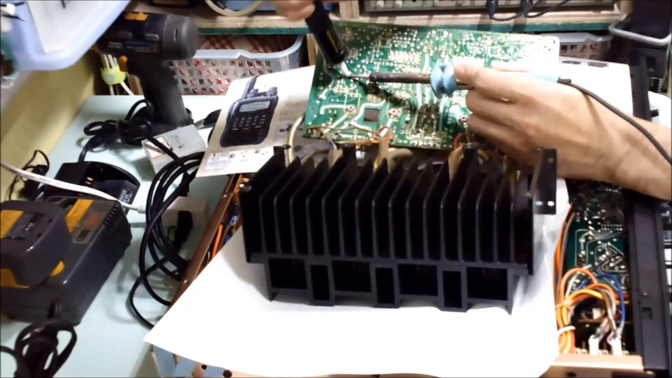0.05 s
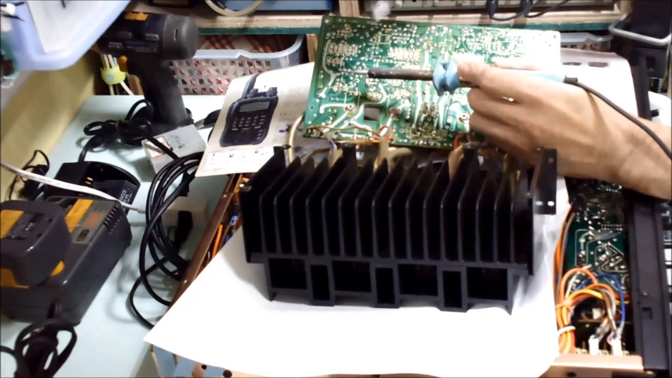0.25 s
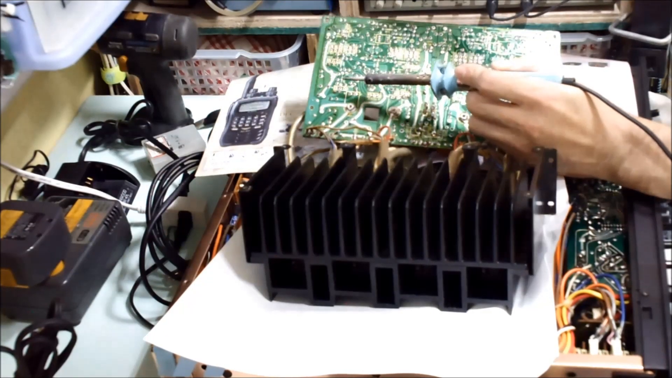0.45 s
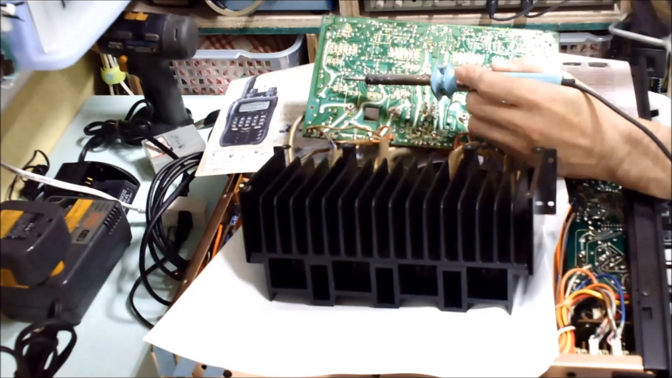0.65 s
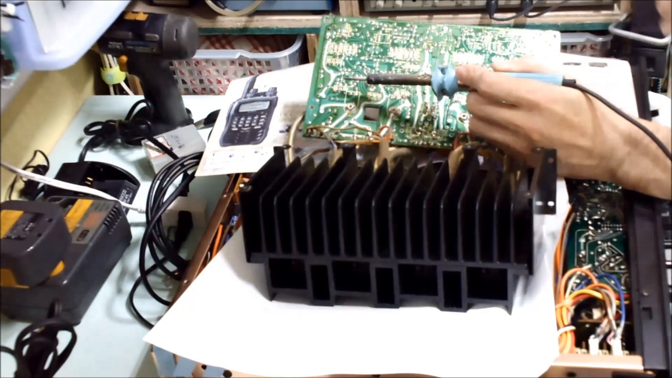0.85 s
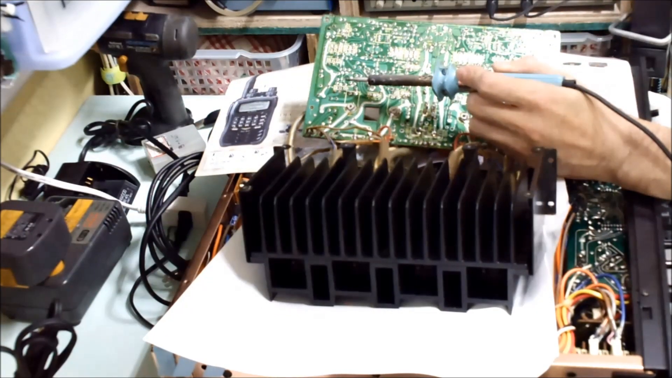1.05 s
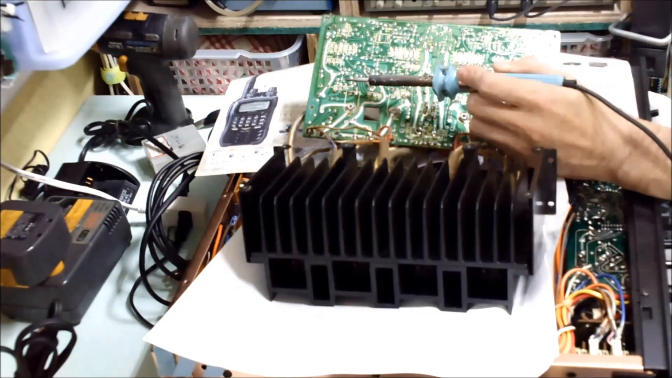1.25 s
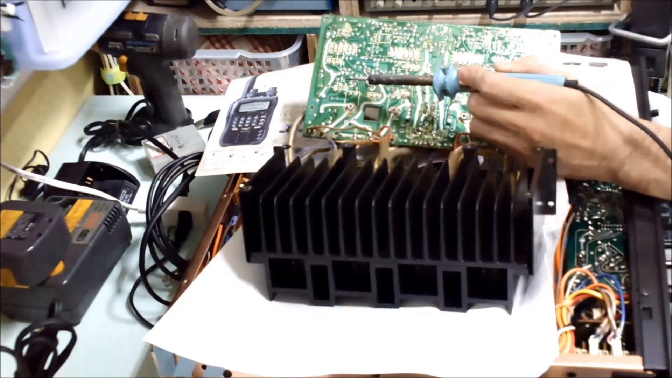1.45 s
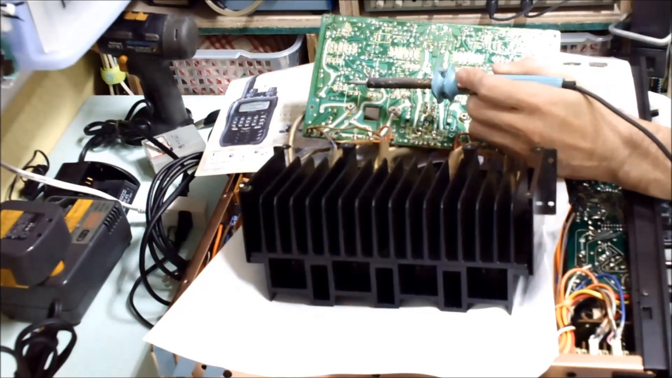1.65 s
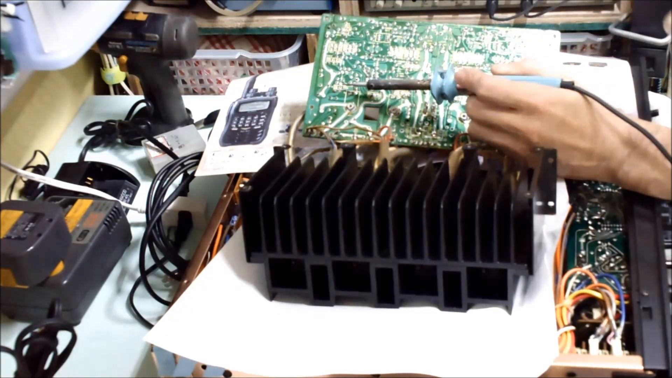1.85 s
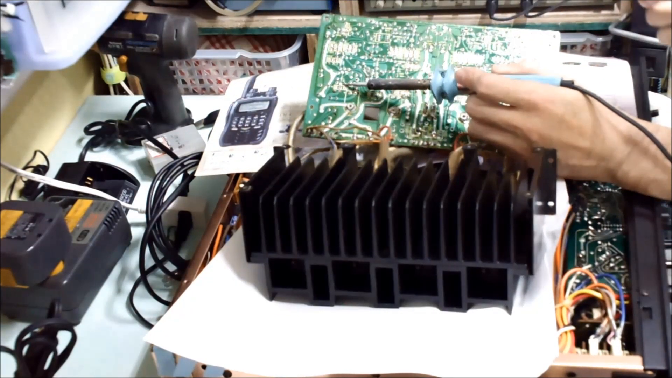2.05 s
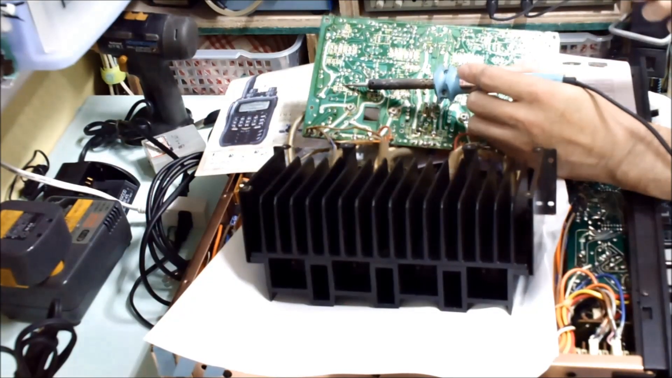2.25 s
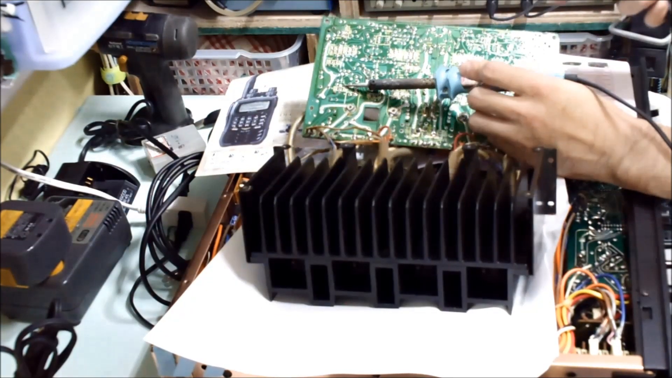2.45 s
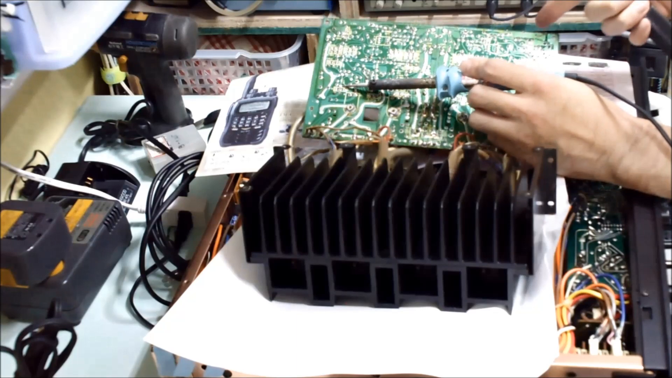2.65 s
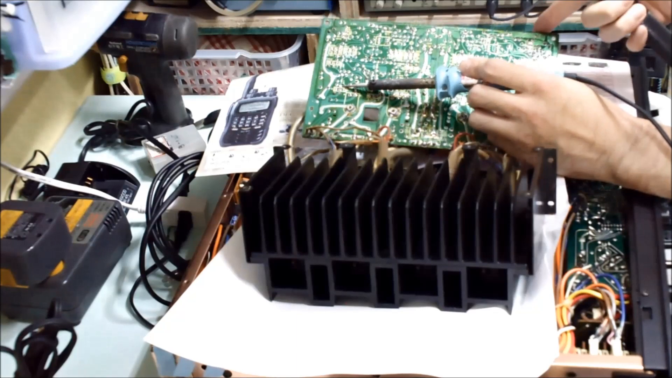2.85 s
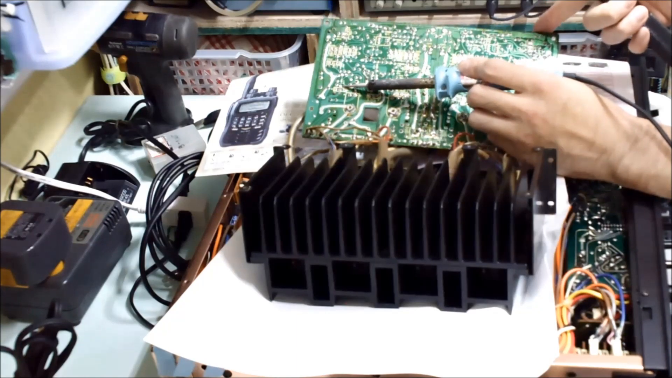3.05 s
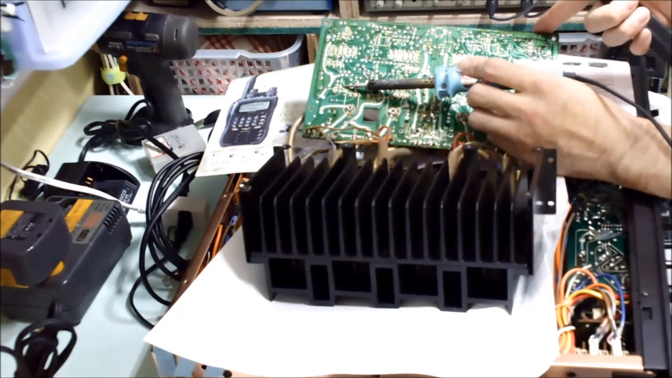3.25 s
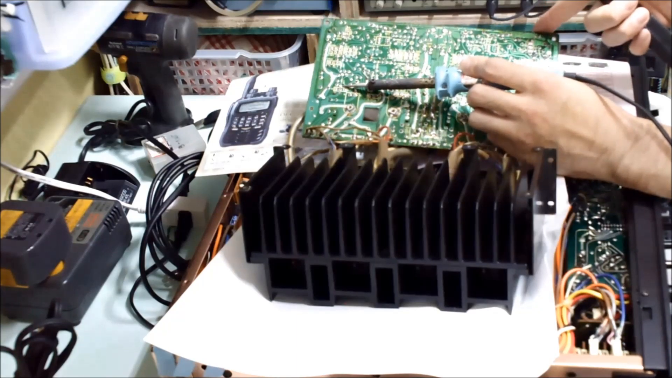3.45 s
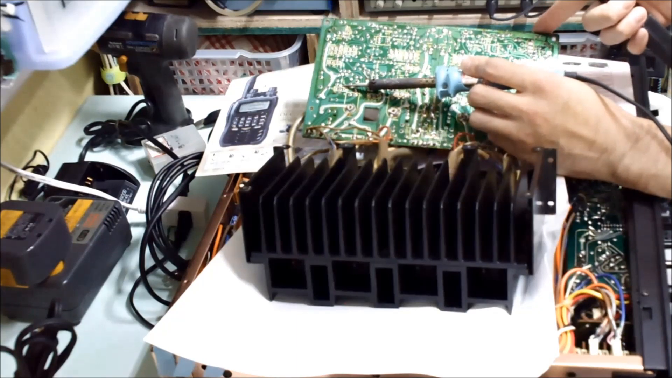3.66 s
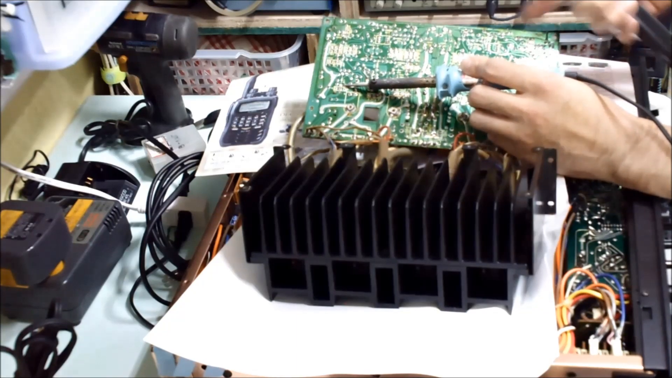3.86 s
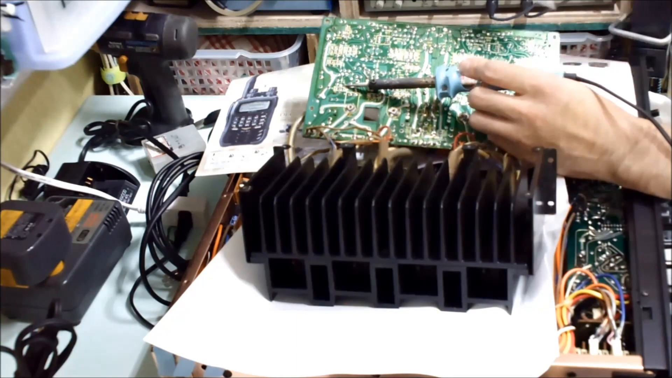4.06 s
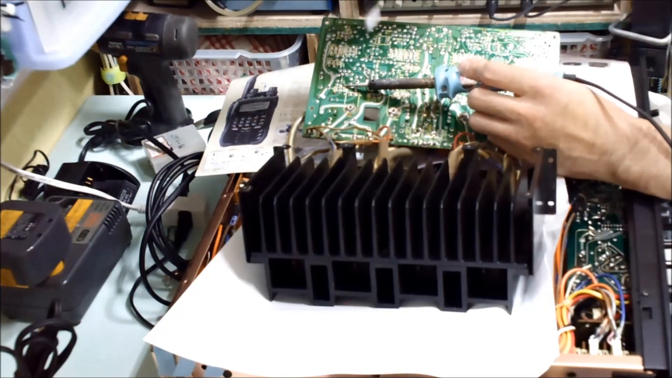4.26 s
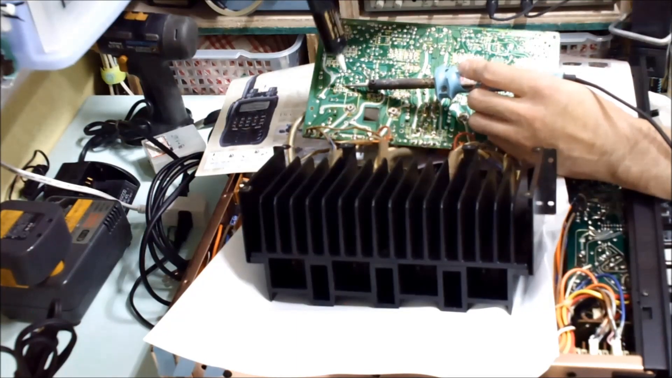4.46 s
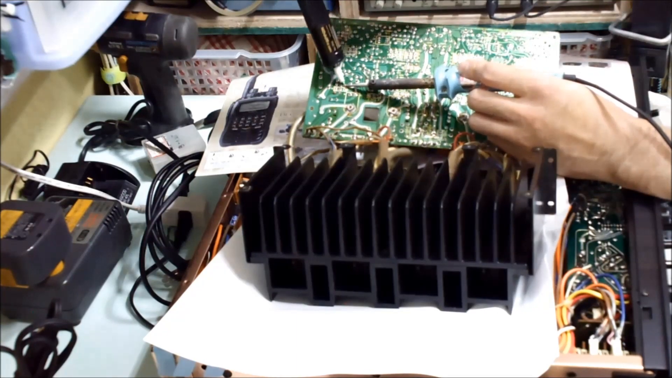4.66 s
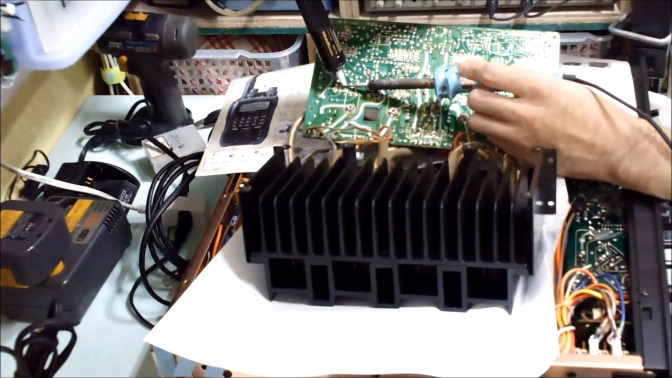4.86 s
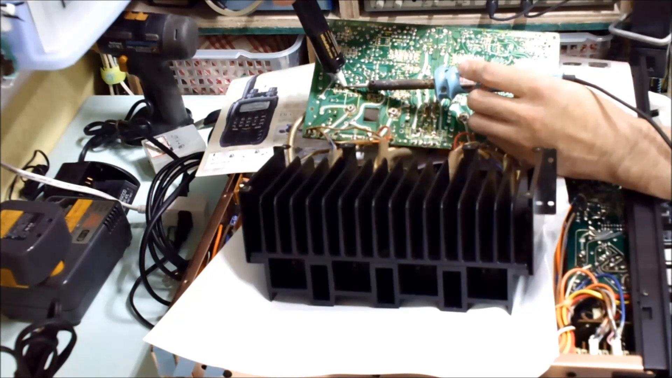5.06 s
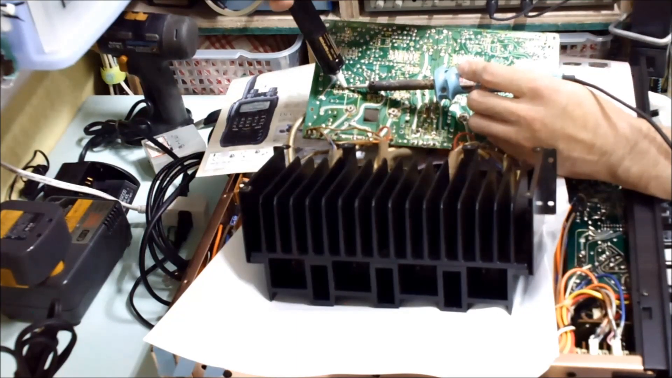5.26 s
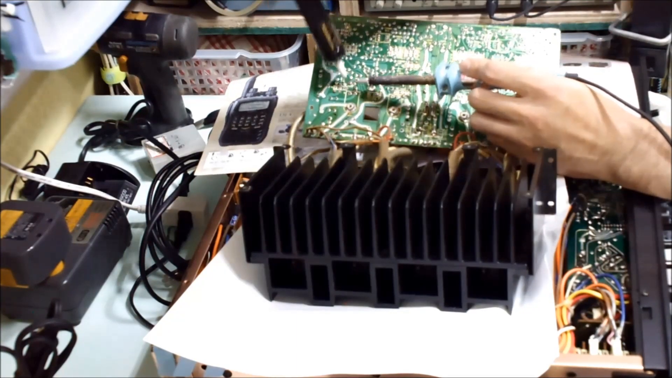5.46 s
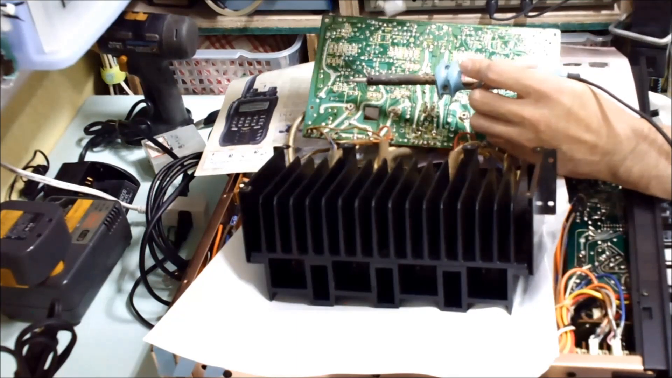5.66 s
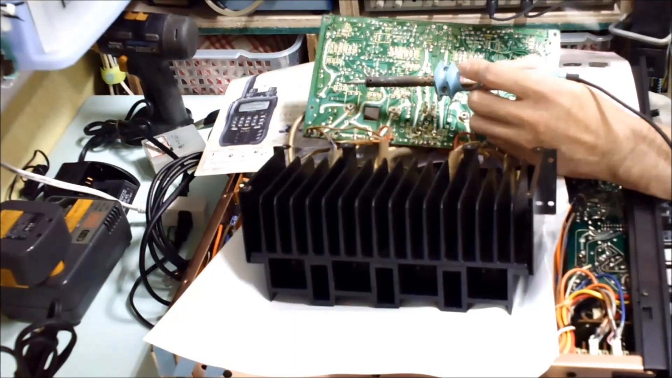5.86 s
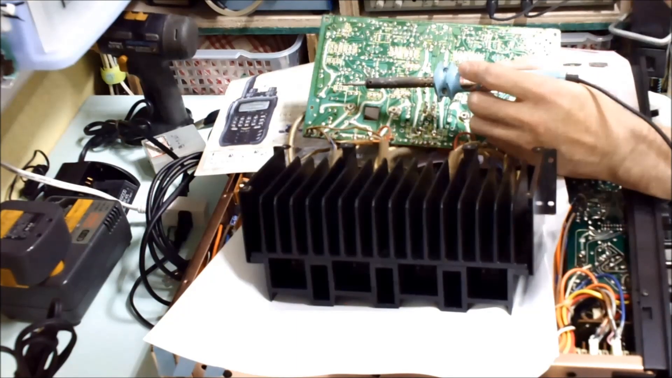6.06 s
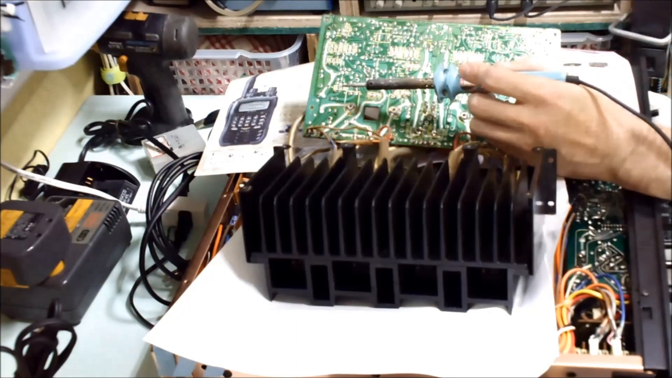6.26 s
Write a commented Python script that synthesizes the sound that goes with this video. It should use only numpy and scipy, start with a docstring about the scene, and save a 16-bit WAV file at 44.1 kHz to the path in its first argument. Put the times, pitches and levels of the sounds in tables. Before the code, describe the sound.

Close in a small dry room, a desoldering pump fires almost at once with a brief air rush, hard crack and springy ring, then a softer nozzle bounce. Light taps and scuffs on a circuit board follow. The pump is recocked with grainy friction, a sharp latch click and a hollower rod knock. More tiny ticks and faint flux sizzle lead to a second shot near the end, over low rumble and hiss.

```python
"""Desoldering pump at a workbench

A spring-loaded pump fires twice on a circuit board in a small room: noise rush of the plunger, hard stop,
ringing spring and board modes. In between it is cocked (grainy friction, gliding whistles) and latched.
Tips tap and scuff the board as filtered bursts, flux sizzles as random grains, over a low rumble, hiss
and a faint electrical ticking. The overall level sinks after each shot and returns in two stages."""
import sys
import numpy as np
from scipy import signal
from scipy.fft import rfft, irfft
from scipy.io import wavfile

SR = 44100
rng = np.random.default_rng(int(sys.argv[2]) if len(sys.argv) > 2 else 0)


def store_wav(level_fs):
    """Save 16-bit WAV to argv[1]."""
    pcm = np.round(np.clip(np.atleast_2d(level_fs), -1, 1) * 32767)
    wavfile.write(sys.argv[1], SR, pcm.T.astype(np.int16))


N = 277830
TIME_S = np.arange(N) / SR

# Rumble colour: (frequency [Hz], level [dB])
RUMBLE_COLOUR = [(15, -5), (30, -1), (54, 2), (80, -2.5), (125, -5.5), (200, -12), (320, -17), (550, -23.5),
                 (1000, -29), (2500, -36), (6000, -56.5)]
# Hiss colour: (frequency [Hz], level [dB])
HISS_COLOUR = [(1000, 0.5), (3300, 2), (3950, 8), (4600, 9), (5400, 8), (6300, 0), (7900, 0), (10000, -1),
               (15500, -2)]
# Narrow rise in the hiss: (centre [Hz], width [Hz], lift [dB])
HISS_WHINE = [(7930, 250, 4.5)]
TICK_HZ, FIRST_TICK_S, TICK_LEAD_S, TICK_JITTER_S = 29.993, 0.0199, 0.004, 0.0005
# Decay of the reflections: (frequency [Hz], t60 [s])
ROOM_T60 = [(100, 0.29), (700, 0.15), (2000, 0.17), (4600, 0.18), (8000, 0.16), (15000, 0.12)]

# Bursts of flux boiling under the iron: (peak time [s], level [dB], rise [s], fall [s])
SIZZLES = [(2.6, -68, .25, .35), (4.3, -56, 0.071, .22)]
# Flux colour: (frequency [Hz], level [dB])
FLUX_COLOUR = [(500, -18), (2300, -15), (3300, -14), (4200, -2.5), (4620, -4.5), (5100, -11), (6500, -19),
               (9000, -32), (15500, -24)]
# Flux resonance: (centre [Hz], width [Hz], lift [dB])
FLUX_RESONANCE = [(4530, 130, 11)]

# Tips sliding on the board: (peak time [s], level [dB], rise [s], fall [s])
SCUFFS = [(0.83, -61.5, .015, .04), (1.015, -58, 0.0066, 0.038), (2.12, -60.5, .008, 0.018),
          (2.35, -59, .006, .03), (5.42, -56.5, 0.055, .03)]
# Nozzle skid around each landing: (level [dB], rise [s], fall [s])
LANDING_SKID = (-42, .004, .03)
SCUFF_TILT_DB_PER_OCT = -2

# Short bursts, tip contacts and electrical ticks together: (time [s], level [dB], treble tilt [dB/octave])
SHORT_BURSTS = [(0.043, -46.5, -5.5), (0.737, -50, -1.5), (1.203, -46.5, 3.5), (1.381, -49, 4),
                (2.369, -48, 2.5), (2.4654, -46.5, 2), (2.5555, -50, 1), (2.7205, -44.5, 4),
                (2.783, -48, 2), (2.855, -49, 4), (3.320, -49, 6), (3.379, -53.5, 2), (3.844, -50.5, 4),
                (3.9865, -35.5, .5), (5.0814, -36, 3)]
STANDOUT_TICK_TIMES_S = (2.855, 3.320, 3.379, 3.844)
# Electrical ticks that stand out by chance: (time [s], level [dB], treble tilt [dB/octave])
STANDOUT_TICKS = [row for row in SHORT_BURSTS if row[0] in STANDOUT_TICK_TIMES_S]
# Pump tip and iron touching the board: (time [s], level [dB], treble tilt [dB/octave])
TAPS = [row for row in SHORT_BURSTS if row[0] not in STANDOUT_TICK_TIMES_S]
# Colour of the short bursts and scuffs: (frequency [Hz], level [dB])
BURST_COLOUR = [(150, -25.5), (450, -11), (1200, -3.5), (2000, -2.5), (3300, -2.5), (4700, 6.5), (5800, -6),
                (7500, -17), (11000, -31.5), (15500, -35)]
# Resonance of the short bursts: (centre [Hz], width [Hz], lift [dB])
BURST_RESONANCE = [(4704, 320, 4)]
BURST_T60_S = 0.041
# Span of the chance touches: (first [s], last [s])
TOUCH_SPAN_S = (.7, 5.45)
TOUCH_DB, TOUCH_SPREAD_DB, TOUCH_TILT_DB_PER_OCT = -55, 2, -1.5
# Recoil lifts the nozzle; it lands this long after the stop, then bounces
REBOUND_S, BOUNCE_S, REBOUND_TILT_DB_PER_OCT = 0.1285, 0.021, -3

# Pushes of the piston along the barrel: (start [s], length [s], level [dB])
PUSHES = [(1.108, .07, -67), (1.252, 0.054, -57.5), (1.385, 0.34, -53), (1.742, 0.023, -46.5)]
PUSH_ATTACK_S, PUSH_RELEASE_S = 0.02, 0.02
# Colour of the piston friction: (frequency [Hz], level [dB])
RUB_COLOUR = [(400, -14.5), (1000, -12), (2500, -12.5), (3500, -10), (4200, 4.5), (4700, 4), (5600, -8.5),
              (7500, -19), (10000, -27), (15500, -36)]
# Released rod scrapes back to its knock; the spring keeps rustling
ROD_SCRAPE_DB, ROD_SCRAPE_S, RUSTLE_DB, RUSTLE_S = -32.5, 0.0062, -54, 0.083
# Lowest air resonance of the barrel, falling as the piston travels: (time [s], frequency [Hz])
AIR_PITCH = [(1.25, 1282), (1.41, 1093), (1.50, 930), (1.62, 810), (1.72, 665), (1.85, 600)]
# First two odd barrel modes: (multiple of the pitch, peak time [s], level [dB], rise [s], fall [s])
AIR_MODES = [(1, 1.41, -65, 0.066, 0.18), (3, 1.72, -60.5, .08, .08)]
# Thin tone after the rod knock: (frequency [Hz], peak time [s], level [dB], rise [s], fall [s])
AFTERTONE = (2200, 1.97, -62.5, .02, 0.15)
# Short hollow blips at the end of the stroke: (time [s], frequency [Hz], level [dB], rise [s])
BLIPS = [(1.7705, 603, -45.5, 0.006), (1.825, 1120, -50, 0.0031)]

# Latch catching: (time [s], level [dB], t60 [s])
LATCH_HIT = (1.7385, -21.5, 0.015)
# Latch colour: (frequency [Hz], level [dB])
LATCH_COLOUR = [(300, -36), (1300, -38), (1900, -1.5), (2300, -11), (3200, -3), (4700, 0), (6300, -10),
                (8800, -10), (11500, -23), (15500, -34)]
# Latch resonances: (centre [Hz], width [Hz], lift [dB])
LATCH_RESONANCES = [(1974, 110, 10.7), (2720, 100, 3.8), (4740, 700, 8.9)]
# Plunger rod knocking back against the latch: (time [s], level [dB], t60 [s])
ROD_HIT = (1.8915, -20.5, 0.033)
# Rod colour: (frequency [Hz], level [dB])
ROD_COLOUR = [(200, -36), (480, -8), (1000, -5), (1500, -7), (1900, 0.5), (2450, -8), (3200, -10.5),
              (4300, -2), (5200, -4), (6500, -19.5), (9000, -24.5), (15500, -51)]
# Rod resonances: (centre [Hz], width [Hz], lift [dB])
ROD_RESONANCES = [(617, 92, 10.4), (2050, 280, 6.8), (2760, 80, 4.9), (4250, 410, 6.5)]

# Pump shots: (trigger [s], plunger stop [s], rush [dB], stop [dB], board thump [dB],
#              nozzle landing [dB], loss per bounce [dB], dip of the overall level [dB])
SHOTS = [(0.1038, 0.1142, -17.5, -9.5, -29, -26.5, 6, -6.5),
         (5.4560, 5.4663, -17.5, -10.5, -31, -31, 15.5, -11)]
# Pump body colour: (frequency [Hz], level [dB])
PUMP_COLOUR = [(100, -15), (280, -19), (500, -14.5), (1050, -15), (1700, -8), (2800, -9), (3800, -3),
               (4600, 2.5), (5700, -2), (7000, -9), (9000, -22.5), (11500, -24), (15500, -37)]
# Barrel resonances: (centre [Hz], width [Hz], lift [dB])
BARREL_RESONANCES = [(817, 160, 7.7), (1440, 56, 8.7), (2000, 330, 3.1), (3210, 100, 6.1), (4700, 460, 3.5),
                     (5770, 80, 3.3), (10800, 550, 3)]
# Bending modes of the board: (frequency [Hz], level [dB], t60 [s])
BOARD_MODES = [(57, -4, 0.41), (125, -3, 0.18), (165, -9, 0.16), (377.7, -11.5, 0.2)]
# Spring and barrel modes ringing after the stop: (frequency [Hz], level [dB], t60 [s])
SPRING_MODES = [(1358, -22, .12), (4120, -17, 0.16), (4500, -20.5, 0.15), (4460, -19, .15),
                (4590, -16, 0.19), (4720, -12.5, 0.1), (4770, -17, 0.087), (5120, -19, .12),
                (5385, -17.5, 0.14), (5840, -23, 0.099)]
CRACK_DB = 16  # first pulse of a blow, relative to its chatter

# Overall level after a shot: sinks, holds, jumps part of the way back, later recovers
DIP_SINK_S, DIP_HOLD_S, DIP_JUMP_S = 0.061, 0.502, 0.02
DIP_LEFT_SHARE, DIP_LINGER_S, DIP_RECOVER_S = 0.48, 1.535, 0.62
CUTOFF_HZ = 15750


def from_db(db):
    """Decibels to gain."""
    return 10 ** (np.asarray(db) / 20)


def at_hz(points, hz):
    """Interpolate a table on a log-frequency axis."""
    freqs, values = np.transpose(points)
    return np.interp(np.log(np.maximum(hz, 1)), np.log(freqs), values)


def level_curve(rows):
    """Gain over time from (time [s], level [dB]) rows; silent outside them."""
    times, levels_db = np.transpose(rows)
    inside = np.interp(TIME_S, times, np.ones(len(times)), 0, 0)
    return inside * from_db(np.interp(TIME_S, times, levels_db))


def ramp(start_s, length_s):
    """Linear rise from 0 to 1."""
    return np.clip((TIME_S - start_s) / length_s, 0, 1)


def swell(peak_s, db, rise_s, fall_s):
    """Gain with exponential growth to its peak and exponential decay after it."""
    before = (peak_s - TIME_S) / rise_s
    after = (TIME_S - peak_s) / fall_s
    return from_db(db) * np.exp(-np.minimum(np.maximum(before, after), 20))


def add(out, start_s, sound):
    """Mix a sound in at its start time."""
    start = round(start_s * SR)
    out[start:start + len(sound)] += sound[:N - start]


def colour(x, spectrum, resonances=(), tilt_db_per_oct=0, size=8192):
    """Minimum-phase filter from a broad spectrum and resonances; white noise keeps its power."""
    hz = np.fft.rfftfreq(size, 1 / SR)
    db = at_hz(spectrum, hz) + tilt_db_per_oct * np.log2(np.maximum(hz, 500))  # tilt from 500 Hz up
    for centre_hz, width_hz, lift_db in resonances:
        db = db + lift_db / (1 + (2 * (hz - centre_hz) / width_hz) ** 2)
    cepstrum = irfft(np.log(from_db(db)))
    causal = 2 * cepstrum[:size // 2]  # folded cepstrum gives minimum phase
    kernel = irfft(np.exp(rfft(causal, size)))
    kernel = kernel / np.linalg.norm(kernel)
    return signal.oaconvolve(x, kernel)[:len(x)]


def grains(per_s):
    """Sparse random slips or bursts, rms 1."""
    present = rng.random(N) < per_s / SR
    return rng.standard_normal(N) * present * np.sqrt(SR / per_s)


def blow(db, t60_s, crack_db, size=12000):
    """One sharp pulse, then dense, quickly dying chatter."""
    force = rng.standard_normal(size) * from_db(-60 * TIME_S[:size] / t60_s)
    force[0] = from_db(crack_db)
    return from_db(db) * force


def ring(start_s, db, modes):
    """Struck modes: decaying sines, each level varying from blow to blow."""
    age_s = np.maximum(TIME_S - start_s, 0)
    out = np.zeros(N)
    for hz, mode_db, t60_s in modes:
        fade_db = np.maximum(-60 * age_s / t60_s, -200)
        gain = from_db(db + mode_db + rng.normal(0, 1) + fade_db)
        out += gain * np.sin(2 * np.pi * hz * age_s)
    return out


def short_bursts(rows, settle_s=0.00087):
    """Dull or bright noise bursts with a softened onset."""
    out = np.zeros(N)
    for time_s, db, tilt in rows:
        force = blow(db, BURST_T60_S, crack_db=0)
        onset = 1 - np.exp(-TIME_S[:len(force)] / settle_s)
        add(out, time_s, colour(force * onset, BURST_COLOUR, BURST_RESONANCE, tilt))
    return out


def room(x, size=22050):
    """Diffuse reflections off bench and walls: noise bands, each with its own decay."""
    hz = np.fft.rfftfreq(size, 1 / SR)
    white = rfft(rng.standard_normal(size))
    echoes = 0
    for k, (_, t60_s) in enumerate(ROOM_T60):
        band = [(row[0], j == k) for j, row in enumerate(ROOM_T60)]
        noise = irfft(white * at_hz(band, hz), size)
        echoes = echoes + noise * from_db(-60 * TIME_S[:size] / t60_s)
    echoes = echoes * np.clip(TIME_S[:size] / 0.0044 - 0.5, 0, 1)  # starts at 2.2 ms, full at 6.6 ms
    return signal.oaconvolve(x, echoes / np.linalg.norm(echoes))[:N]


def electrical_ticks(main_db, lead_db, skip_share, low_hz, high_hz, count=189):
    """Interference: band-passed pulse train, each tick led by a less regular one; some missing."""
    beats_s = FIRST_TICK_S + np.arange(count) / TICK_HZ
    leads_s = beats_s - TICK_LEAD_S + TICK_JITTER_S * rng.standard_normal(count)
    pulses = np.zeros(N)
    for times_s, db in ((beats_s, main_db), (leads_s, lead_db)):
        gains = from_db(db + rng.normal(0, 1.6, count))
        present = rng.random(count) > skip_share
        pulses[(times_s * SR).astype(int)] = gains * present
    band = signal.butter(4, [low_hz, high_hz], "band", fs=SR, output="sos")
    return signal.sosfilt(band, pulses + 1e-18)


def background():
    """Coloured-noise rumble and hiss, plus electrical ticking."""
    rumble = from_db(-52.5) * colour(rng.standard_normal(N), RUMBLE_COLOUR)
    hiss = from_db(-65) * colour(rng.standard_normal(N), HISS_COLOUR, HISS_WHINE)
    ticks = electrical_ticks(main_db=-26, lead_db=-25.5, skip_share=0.17, low_hz=3873, high_hz=5530)
    return rumble + hiss + ticks


def standout_ticks():
    """Electrical ticks that stand out from the train, as short noise bursts."""
    return short_bursts(STANDOUT_TICKS)


def sizzle():
    """Flux boiling off the hot joint: random grains in swelling bursts."""
    envelope = sum(swell(*burst) for burst in SIZZLES)
    return envelope * colour(grains(per_s=4000), FLUX_COLOUR, FLUX_RESONANCE)


def scuffs():
    """Dry, grainy sliding of tips on the board, and of the nozzle as it lands."""
    skids = [(stop_s + REBOUND_S, *LANDING_SKID) for _, stop_s, *_ in SHOTS]
    envelope = sum(swell(*slide) for slide in SCUFFS + skids)
    return envelope * colour(grains(per_s=5000), BURST_COLOUR, tilt_db_per_oct=SCUFF_TILT_DB_PER_OCT)


def touches(count=12):
    """Faint chance contacts, one at random in each equal slot of the span: rows like TAPS."""
    first_s, last_s = TOUCH_SPAN_S
    rows = []
    for k in range(count):
        time_s = first_s + (last_s - first_s) * (k + rng.random()) / count
        db = TOUCH_DB + TOUCH_SPREAD_DB * rng.standard_normal()
        rows.append((time_s, db, TOUCH_TILT_DB_PER_OCT))
    return rows


def rebounds(count=3):
    """Nozzle landing after each shot, bouncing ever more weakly: rows like TAPS."""
    rows = []
    for _, stop_s, _, _, _, landing_db, loss_db, _ in SHOTS:
        for k in range(count):
            time_s = stop_s + REBOUND_S + k * BOUNCE_S
            rows.append((time_s, landing_db - k * loss_db, REBOUND_TILT_DB_PER_OCT))
    return rows


def board_taps():
    """Light contacts of metal tips with the board, as short noise bursts."""
    return short_bursts(TAPS + rebounds() + touches())


def stick_slip(depth_db, per_s, count=4000):
    """Uneven grip of friction: a random gain curve."""
    wander = np.interp(TIME_S * per_s, np.arange(count), rng.standard_normal(count))
    return from_db(depth_db * wander)


def piston_rub():
    """Grainy friction in the barrel: each push of the thumb, then the rod running back."""
    pressure = 0
    for start_s, length_s, db in PUSHES:
        release = np.exp(-np.clip((TIME_S - start_s - length_s) / PUSH_RELEASE_S, 0, 20))
        pressure = pressure + from_db(db) * ramp(start_s, PUSH_ATTACK_S) * release
    knock_s = ROD_HIT[0]
    scrape = swell(knock_s, ROD_SCRAPE_DB, ROD_SCRAPE_S, ROD_SCRAPE_S)
    rustle = swell(knock_s, RUSTLE_DB, ROD_SCRAPE_S, RUSTLE_S)
    friction = grains(per_s=3000) * stick_slip(depth_db=1.5, per_s=92)
    return (pressure + scrape + rustle) * colour(friction, RUB_COLOUR)


def whistle(hz, relative_width):
    """Turbulence in a narrow resonance: low-passed noise on a carrier that may glide."""
    lowpass = signal.butter(2, relative_width * np.mean(hz) / 2, fs=SR, output="sos")
    flutter = signal.sosfilt(lowpass, rng.standard_normal((2, N)))
    phase = 2 * np.pi * np.cumsum(hz * np.ones(N)) / SR
    return (flutter[0] * np.cos(phase) + flutter[1] * np.sin(phase)) / flutter.std()


def barrel_air():
    """Breathy barrel modes that fall together during the stroke, and the tone left after it."""
    pitch_hz = np.interp(TIME_S, *np.transpose(AIR_PITCH))
    out = np.zeros(N)
    for multiple, *shape in AIR_MODES:
        out += swell(*shape) * whistle(multiple * pitch_hz, relative_width=0.11)
    hz, *shape = AFTERTONE
    return out + swell(*shape) * whistle(hz, relative_width=0.11)


def blips():
    """Soft, nearly pure little tones that swell and die."""
    out = np.zeros(N)
    for start_s, hz, db, rise_s in BLIPS:
        age_s = np.clip(TIME_S - start_s, 0, 20 * rise_s)
        envelope = age_s / rise_s * np.exp(1 - age_s / rise_s)
        out += from_db(db) * envelope * np.sin(2 * np.pi * hz * age_s)
    return out


def single_hit(hit, spectrum, resonances, crack_db):
    """One blow on a pump part, filtered by its resonances."""
    time_s, db, t60_s = hit
    force = np.zeros(N)
    add(force, time_s, blow(db, t60_s, crack_db))
    return colour(force, spectrum, resonances)


def cocking():
    """Piston slides down against the spring, latch catches, rod is let go and knocks back."""
    latch = single_hit(LATCH_HIT, LATCH_COLOUR, LATCH_RESONANCES, crack_db=17)
    rod = single_hit(ROD_HIT, ROD_COLOUR, ROD_RESONANCES, CRACK_DB)
    return piston_rub() + barrel_air() + blips() + latch + rod


def pump_shots():
    """Spring drives the plunger rattling up the barrel into its stop; the recoil bends the board."""
    force, ringing = np.zeros(N), np.zeros(N)
    for trigger_s, stop_s, rush_db, stop_db, thump_db, *_ in SHOTS:
        rush = level_curve([(trigger_s - 0.001, -16), (trigger_s + 0.00075, 0),
                            (trigger_s + 0.0034, 0), (stop_s, -7)])
        force += from_db(rush_db) * rush * rng.standard_normal(N)
        add(force, stop_s, blow(stop_db, t60_s=0.034, crack_db=CRACK_DB))
        ringing += ring(trigger_s, thump_db, BOARD_MODES)
        for mode in SPRING_MODES:  # out of step as the shock runs along the spring
            ringing += ring(stop_s + rng.uniform(0.0005, 0.0036), stop_db, [mode])
    return colour(force, PUMP_COLOUR, BARREL_RESONANCES) + ringing


def level_dip():
    """Gain of the whole scene: sinks after each shot, comes back in two stages."""
    db = 0
    for _, stop_s, *_, depth_db in SHOTS:
        sunk = 1 - np.exp(-np.maximum(TIME_S - stop_s, 0) / DIP_SINK_S)
        jump = ramp(stop_s + DIP_HOLD_S, DIP_JUMP_S)
        recovery = ramp(stop_s + DIP_LINGER_S, DIP_RECOVER_S)
        db = db + depth_db * sunk * (1 - (1 - DIP_LEFT_SHARE) * jump) * (1 - recovery)
    return from_db(db)


def scene():
    """Pump, iron, ticks, reflections and background, all under the level dip."""
    shots = pump_shots()
    details = cocking() + board_taps() + scuffs() + sizzle() + standout_ticks()
    reflections = room(from_db(-8.5) * shots + from_db(-9.5) * details)
    mix = shots + details + reflections + background()
    return (level_dip() * mix)[None]


def record(dry):
    """Steep elliptic low-pass cuts the top."""
    lowpass = signal.ellip(12, 0.1, 100, CUTOFF_HZ, fs=SR, output="sos")
    return signal.sosfilt(lowpass, dry)


dry = scene()
out = record(dry)
store_wav(out)
```